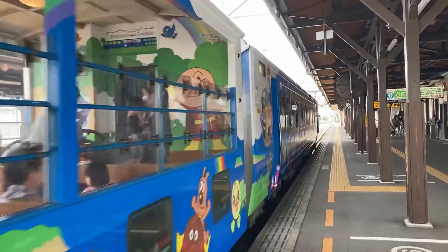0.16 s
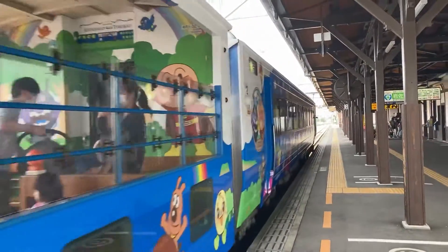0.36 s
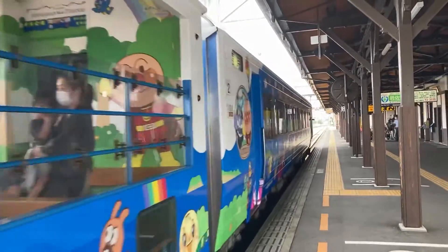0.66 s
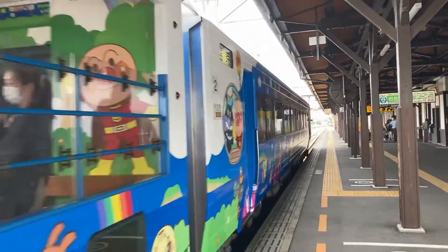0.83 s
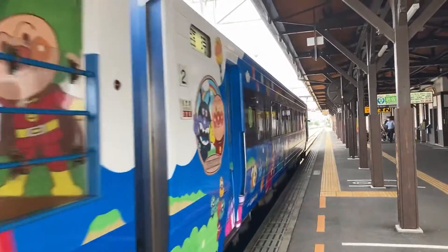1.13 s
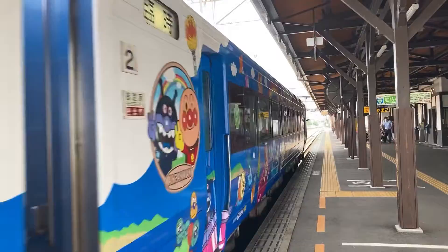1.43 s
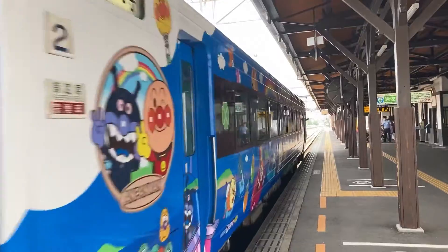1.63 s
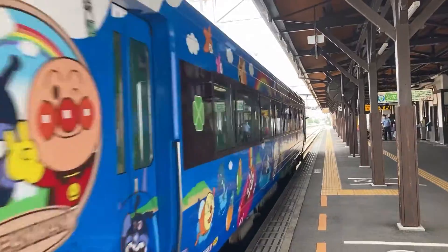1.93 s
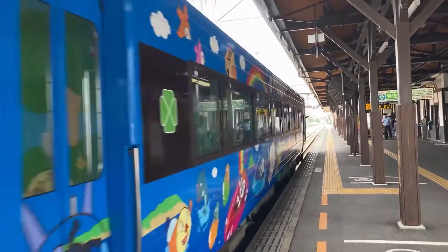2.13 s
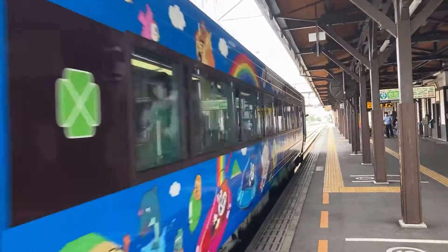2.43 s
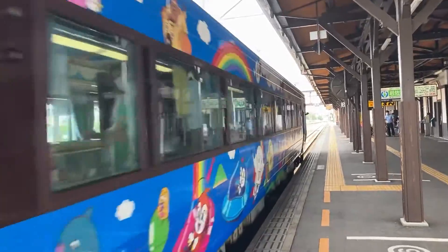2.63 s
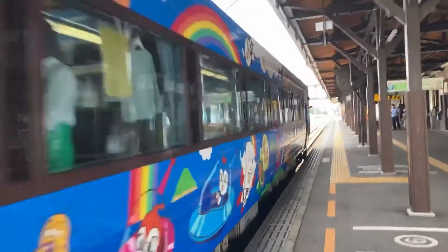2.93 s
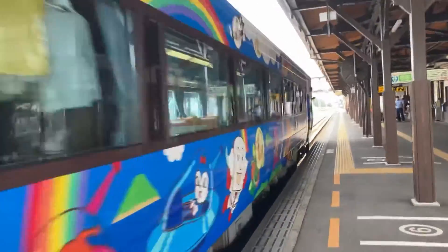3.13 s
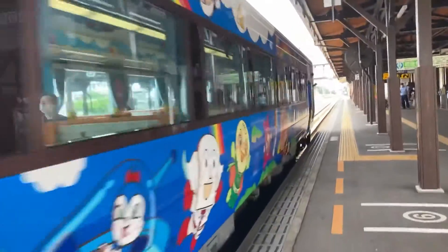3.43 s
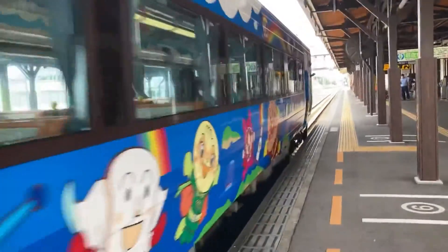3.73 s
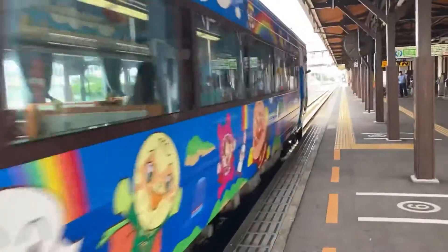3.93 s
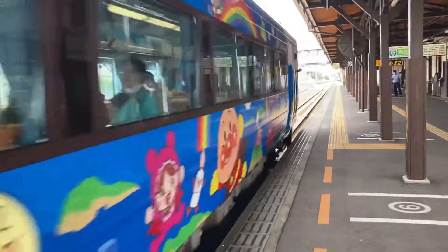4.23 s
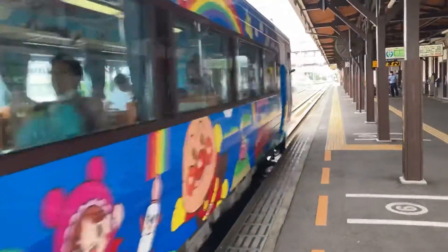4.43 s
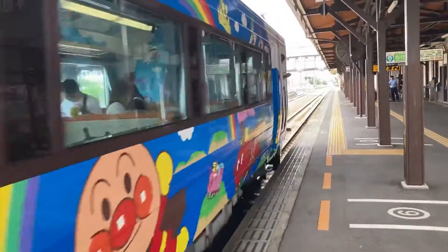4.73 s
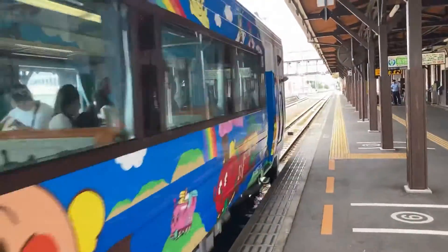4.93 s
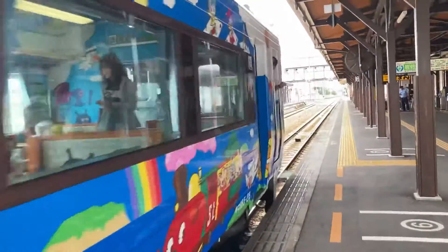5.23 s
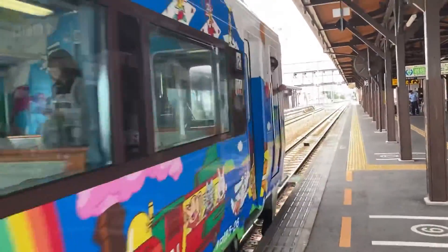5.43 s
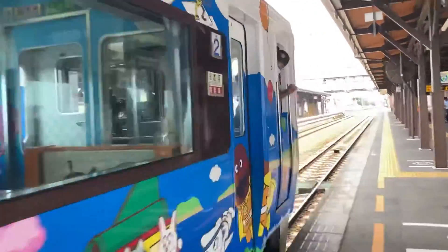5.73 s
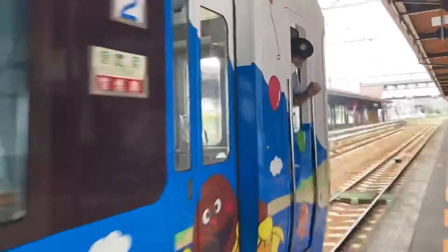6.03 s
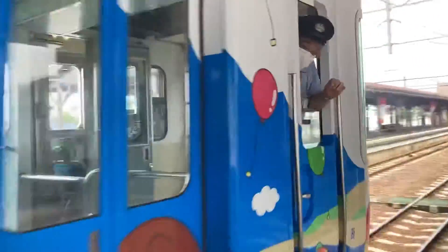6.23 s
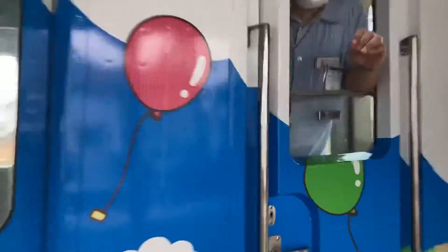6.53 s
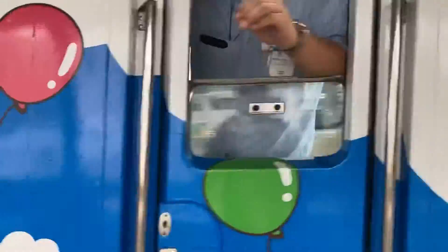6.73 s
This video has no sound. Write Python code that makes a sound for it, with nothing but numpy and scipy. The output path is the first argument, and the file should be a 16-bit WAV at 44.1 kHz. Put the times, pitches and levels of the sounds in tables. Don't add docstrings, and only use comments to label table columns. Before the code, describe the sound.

Close to a departing diesel railcar: droning exhaust, underfloor rumble, clatter and airy hiss slide past, punctuated by five hard metallic wheel knocks.

```python
import sys
import numpy as np
from scipy import signal
from scipy.fft import rfft, irfft, next_fast_len
from scipy.io import wavfile

SR = 44100
rng = np.random.default_rng(int(sys.argv[2]) if len(sys.argv) > 2 else 0)


def convert_level_to_amplitude(level_db):
    exponent = np.asarray(level_db, float) / 20
    return 10 ** exponent


def digitize_waveform(pressure):
    field = np.atleast_2d(pressure).T
    bounded = np.clip(field, -1, 1)
    quanta = np.round(bounded * 32767).astype(np.int16)
    wavfile.write(sys.argv[1], SR, quanta)


N = 302967

# (time [s], peak [dB], low rail ring [dB], middle rail ring [dB], high rail ring [dB])
WHEEL_ARRIVALS = [
    (0.604, -13.5, -12, -5.5, -18),
    (1.928, -5.5, -16, -12, -11),
    (2.534, -9, -10, -15, -4),
    (5.486, -6, -35, -4.5, -28),
    (5.923, -12, -2, -8, -6.5),
]
# (rim ring [dB], lead-in off the near rail end [dB], bounces [dB], rattle [dB])
WHEEL_CHARACTER = [(-37, 4, 5, 8), (-29, 8, -20, 1.5), (-14, -14, 0, 5.5), (-24, -3.5, -16, 2),
                   (-8.5, -19, 3.5, 9)]
# (pitch [Hz], level [dB], upper thump [dB], deep thump [dB])
FIRST_BITES = [(513, -5, -13, -23.5), (544, -2, -13, -15.5), (663, -19.5, -13.5, -12.5),
               (522, 6.5, -10, -28), (744.6, -2, -17, -4)]


def rms_one(x):
    return x / np.sqrt(np.mean(x ** 2) + 1e-20)


def in_time(rows):
    s, *columns = np.transpose(rows)
    return [np.interp(np.arange(N) / SR, s, column) for column in columns]


def at_hz(points, hz):
    p = np.array(points, float)
    return np.interp(np.log(np.maximum(hz, 1)), np.log(np.maximum(p[:, 0], 1)), p[:, 1])


def passing_db(closest_s, reach_s):
    return -20 * np.log10(1 + ((np.arange(N) / SR - closest_s) / reach_s) ** 2)


def drift(rate):
    hop = 40
    r = np.exp(-2 * hop * np.pi * rate / SR)
    coarse = rng.standard_normal(N // hop + 2002)
    slow = signal.lfilter([1], [1, -2 * r, r * r], coarse)[2000:]
    return np.interp(np.arange(N) / hop, np.arange(len(slow)), rms_one(slow))


def ring(clicks, hz, t60):
    r = convert_level_to_amplitude(-60 / (t60 * SR))
    w = 2 * np.pi * hz / SR
    return signal.lfilter([0, np.sin(w)], [1, -2 * r * np.cos(w), r * r], clicks + 1e-18)


def spread(mid, side, hz):
    # (frequency [Hz], left-right likeness [0..1])
    likeness = [(60, 0.87), (250, 0.951), (500, 0.696), (1000, 0.47), (1700, 0.13), (4000, 0.21),
                (5500, 0.44), (6800, 0.8), (16000, 0.197)]
    alike = np.clip(at_hz(likeness, hz), 0, 1)
    return np.sqrt(1 + alike) * mid + np.sqrt(1 - alike) * side * [[1], [-1]]


def banded_noise(spectrum, patchy_db, shared):
    out, together = 0, drift(30)
    lowest_hz, highest_hz = spectrum[0][0], spectrum[-1][0]
    edges = lowest_hz * 2 ** np.arange(0, np.log2(highest_hz / lowest_hz) + .01, 1 / 3)
    white = rng.standard_normal((2, 2, N))
    for k, (low, high) in enumerate(zip(edges, edges[1:])):
        band = signal.butter(2, [low, high], "band", fs=SR, output="sos")
        mid, side = signal.sosfilt(band, white[k % 2])
        hz = np.sqrt(low * high)
        flicker = shared * together + drift(5.1) + 0.435 * drift(0.9)
        out = out + convert_level_to_amplitude(at_hz(spectrum, hz) + patchy_db * flicker) * spread(mid, side, hz)
    return rms_one(out)


def crank_turns(rev_per_s, climb, short, settle_s):
    s = np.arange(N) / SR
    free_speed = rev_per_s + climb * s - short * np.exp(-s / settle_s)
    return np.cumsum(np.minimum(free_speed, 33.3)) / SR


def exhaust(turns, levels_db):
    # (multiple of crank speed, level against order 3 [dB])
    weak_orders = [(2.5, -16), (3.5, -14), (4.5, -16), (5, -14), (6, -10), (8, -12)]
    out = convert_level_to_amplitude(-53.5) * np.sin(2 * np.pi * turns)
    for multiple, level_db in zip((2, 3, 4, 7), levels_db):
        phase = 2 * np.pi * multiple * turns + .15 * drift(3)
        out = out + convert_level_to_amplitude(level_db + 1.2 * drift(5)) * np.sin(phase)
    for multiple, below_db in weak_orders:
        phase = 2 * np.pi * multiple * turns + 0.61 * drift(4.8)
        out = out + convert_level_to_amplitude(levels_db[1] + below_db - 0.5 + 3.3 * drift(4.0)) * np.sin(phase)
    return np.sqrt(2) * out


def orders_db(curve, third_db, follows_block, follows_outlet, seventh_db):
    block_db, outlet_db = in_time(curve)
    third = third_db + follows_block * (block_db + 25.5) + follows_outlet * (outlet_db + 33)
    return block_db, third, outlet_db, block_db + seventh_db + 4 * drift(1.95)


def front_engine():
    # (time [s], block throb [dB], exhaust outlet [dB])
    front_pass = [(0, -36.5, -25.5), (.2, -26, -16.5), (.33, -30, -21.5), (.43, -25.5, -38),
                  (.55, -26, -24), (.68, -23, -19), (.8, -25, -24), (1.0, -25.5, -19), (1.65, -25, -12.5),
                  (2.05, -27.5, -18), (2.45, -22, -17), (2.75, -25, -19), (3.05, -28, -16),
                  (3.55, -25.5, -28.5), (4.2, -31, -29), (4.9, -36, -36), (6.87, -35, -46)]
    turns = crank_turns(rev_per_s=30.2, climb=.27, short=3.35, settle_s=.54)
    levels_db = orders_db(front_pass, third_db=-35.5, follows_block=0.143, follows_outlet=0.23, seventh_db=-15)
    return exhaust(turns, levels_db)


def rear_engine(turns):
    # (time [s], block throb [dB], exhaust outlet [dB])
    rear_pass = [(0, -45, -50), (.6, -44, -50), (1.4, -39.5, -45), (2.1, -22, -36.5), (2.8, -33, -47),
                 (3.3, -39, -40), (3.9, -37, -35.5), (4.7, -26.5, -28.5), (5.2, -25, -34),
                 (5.7, -33.5, -40.5), (6.0, -32, -32.5), (6.35, -21, -32), (6.87, -28, -32.5)]
    levels_db = orders_db(rear_pass, third_db=-29.5, follows_block=0.52, follows_outlet=0.54, seventh_db=-24)
    return exhaust(turns, levels_db)


def noise_levels():
    # (time [s], roar from between the bogies [dB], cooling air [dB])
    car_pass = [(0, -28.5, -42.5), (.42, -28, -40.5), (.9, -26.5, -39), (1.42, -26.5, -38.5),
                (1.9, -24.5, -34), (2.3, -24, -35.5), (2.6, -21.5, -33), (3.0, -22, -32.5),
                (3.3, -21.5, -31), (3.85, -20.5, -32), (4.17, -21, -35.5), (4.8, -23, -36.5),
                (5.43, -22.5, -38.5), (5.55, -30.5, -38), (5.85, -27, -42), (6.05, -28.5, -39.5),
                (6.4, -28, -44), (6.87, -29, -42.5)]
    roar_db, air_db = in_time(car_pass)
    clatter_db = -27.5 + 0.48 * (roar_db + 25) + 0.19 * (air_db + 38)
    under_db = -24.5 + 0.617 * (roar_db + 24) + 0.28 * (air_db + 37.5)
    end_db = -25.5 + passing_db(closest_s=7, reach_s=0.7)
    rumble_db = 20 * np.log10(np.hypot(convert_level_to_amplitude(under_db), convert_level_to_amplitude(end_db)))
    return rumble_db, roar_db, clatter_db, air_db


def engine_noise(turns):
    # (frequency [Hz], density [dB per Hz])
    rumble = [(25, -20.5), (45, -6.5), (65, 1), (100, 5), (150, 0.5), (250, 0.5), (350, -6.5), (500, -80)]
    # (frequency [Hz], density [dB per Hz])
    roar = [(200, -26.5), (350, -2), (550, -3), (750, -2), (920, 1.5), (1150, -6), (1400, -9.5),
            (2000, -34.5)]
    # (frequency [Hz], density [dB per Hz])
    clatter_spectrum = [(900, -9), (1400, 3), (1700, -4), (2100, 1), (2500, -0.5), (3000, -5.5), (4200, -5),
                        (5000, -18), (6500, -48.5)]
    # (frequency [Hz], density [dB per Hz])
    hiss = [(3500, -11.5), (5000, 0.5), (5900, 0.5), (7200, -7.5), (8500, 6), (10700, -7), (12800, -8),
            (15200, -11), (17500, -12)]
    rumble_db, roar_db, clatter_db, hiss_db = noise_levels()
    firing = np.cos(4 * np.pi * turns + 1.7 * drift(6.2))
    out = convert_level_to_amplitude(rumble_db) * banded_noise(rumble, patchy_db=-1.0, shared=0.64)
    out += convert_level_to_amplitude(roar_db + 0.57 * firing) * banded_noise(roar, patchy_db=1.5, shared=0.167)
    clatter = banded_noise(clatter_spectrum, patchy_db=1.14, shared=0.55)
    dull = signal.sosfiltfilt(signal.butter(6, 2720, fs=SR, output="sos"), clatter)
    shroud_db = np.maximum(passing_db(closest_s=4.4, reach_s=2.4), -5)
    out += convert_level_to_amplitude(clatter_db + 0.61 * firing) * (dull + convert_level_to_amplitude(shroud_db) * (clatter - dull))
    return out + convert_level_to_amplitude(hiss_db + 0.69 * firing) * banded_noise(hiss, patchy_db=0.773, shared=0.65)


def auxiliary_drive():
    # (pitch [Hz], width [Hz], level [dB])
    whine_lines = [(230, 2.9, -8.5), (440.5, 14.6, 6), (924, 25, -1), (2540, 96, -2.5), (862, 45, 0),
                   (2608, 49, -0.5)]
    # (level when closest [dB], closest [s], time until 6 dB down [s])
    whine_pass = [(-22, 2.85, -0.2), (-36.5, 2.3, 2.15), (-24.5, 3.34, 0.2), (-29, 3.72, 0.67),
                  (-30, 4.78, 0.6), (-36.5, 2.5, 1.4)]
    out = 0
    for (hz, width_hz, level_db), (near_db, closest_s, reach_s) in zip(whine_lines, whine_pass):
        curve_db = near_db + passing_db(closest_s, reach_s) + 3.5 * drift(1.65)
        mid, side = ring(rng.standard_normal((2, N)), hz, 1.77 / width_hz)
        out = out + convert_level_to_amplitude(curve_db + level_db) * rms_one(spread(mid, side, hz))
    return out


def panels(level_db):
    pitches = np.geomspace(700, 4600, 12) * rng.uniform(.96, 1.04, 12)
    shaken, out = rng.standard_normal(N), 0
    for hz in pitches:
        hum = rms_one(ring(shaken * convert_level_to_amplitude(7.0 * drift(2.5)), hz, 120 / hz))
        out = out + convert_level_to_amplitude(-5.0 * np.log2(hz / 500)) * hum
    return convert_level_to_amplitude(level_db) * rms_one(out)


def gear_notes():
    # (closest [s], level [dB], time until 12 dB down [s])
    axle_gears = [
        (3.9, -30, .4),
        (5.2, -30, .3),
    ]
    s = np.arange(N) / SR
    hum_db = -26 + 2 * passing_db(closest_s=3.55, reach_s=.5) + 1.5 * drift(2)
    hum = convert_level_to_amplitude(hum_db) * np.sin(2 * np.pi * 221.5 * s + 0.344 * drift(3.9))
    near = sum(convert_level_to_amplitude(db + 2 * passing_db(closest_s, reach_s)) for closest_s, db, reach_s in axle_gears)
    start_hz, climb_hz_per_s = 154.5, 21
    mesh = np.sin(2 * np.pi * (start_hz + climb_hz_per_s * s / 2) * s + 0.63 * drift(6.9))
    return np.sqrt(2) * (hum + near * convert_level_to_amplitude(2.0 * drift(6.7)) * mesh)


def rail_and_wheel_ring(at):
    # (time after contact [s], level [dB])
    landing = [
        (0, 3.5),
        (.002, 8),
        (.004, -1),
    ]
    # (time after contact [s], level [dB])
    bounces = [
        (0.013, 1),
        (0.028, -5),
        (.045, -31),
        (.07, -1.5),
    ]
    # (pitch [Hz], level [dB], t60 [s])
    rail_modes = [(342.4, 7, 0.1), (520, 10.5, 0.082), (652, 6, 0.082)]
    # (pitch [Hz], level [dB], t60 [s])
    wheel_modes = [(206.8, -13, 0.029), (293, -12, 0.11), (419.4, -5, 0.0894), (600, -18, 0.0485),
                   (814, -47, 0.059), (930, -8, 0.058), (1200, -37, 0.04)]
    # (pitch [Hz], level [dB], t60 [s])
    rim_modes = [(2550, 0, .07), (2630, -4, .06), (3340, -10, .1), (3420, -12, .06), (4200, -12, .05)]
    rows, out = np.array(WHEEL_ARRIVALS), np.zeros(N)
    rim_db, lead_db, bounce_db, _ = np.transpose(WHEEL_CHARACTER)
    blows = [(-.018, lead_db), (-.009, lead_db - 19), *landing]
    blows += [(s, db + bounce_db) for s, db in bounces]
    luck = rng.normal(0, 1, (len(rows), len(wheel_modes)))
    modes = [(hz, db + rows[:, 2 + k], t60) for k, (hz, db, t60) in enumerate(rail_modes)]
    modes += [(hz, db + 1.8 * luck[:, k], t60) for k, (hz, db, t60) in enumerate(wheel_modes)]
    modes += [(hz, db + rim_db, t60) for hz, db, t60 in rim_modes]
    for k, (hz, level_db, t60) in enumerate(modes):
        clicks = np.zeros(N)
        for lag, blow_db in blows:
            cycles = round(lag * hz + 450 / hz)
            late = round(cycles / hz * SR)
            clicks[at + late] += convert_level_to_amplitude(rows[:, 1] + level_db + blow_db - 13.0)
        out += (-1) ** k * ring(clicks, hz, t60)
    return out


def first_bite(at):
    out = np.zeros(N)
    s = np.arange(2000) / SR
    for start, (hz, level_db, *_) in zip(at, FIRST_BITES):
        swell = np.e * s / 0.0055 * np.exp(-s / 0.0036)
        out[start:start + 2000] += convert_level_to_amplitude(level_db) * swell * np.sin(2 * np.pi * hz * s)
    return out


def ground_swing(at, level_db, hz, t60):
    push = np.zeros(N)
    push[at] = convert_level_to_amplitude(level_db) * 20 / (t60 * SR)
    return ring(ring(push, hz, t60), hz, t60)


def rattle_and_splash(at):
    peak_db = np.array(WHEEL_ARRIVALS)[:, 1]
    rim_db, _, _, rattle_db = np.transpose(WHEEL_CHARACTER)
    shake = np.zeros((2, N))
    shake[:, at] = convert_level_to_amplitude(peak_db + rattle_db + np.outer([0, 0.22], rim_db - rim_db.mean()))
    shake = signal.lfilter([1], [1, -convert_level_to_amplitude(-60 / (.35 * SR))], shake + 1e-18)
    shake = signal.lfilter([.01], [1, -.99], shake)
    dull_band = signal.butter(3, [250, 900], "band", fs=SR, output="sos")
    bright_band = signal.butter(1, [1500, 9000], "band", fs=SR, output="sos")
    rattle = signal.sosfilt(dull_band, rng.standard_normal((2, N)))
    splash = signal.sosfilt(bright_band, rng.standard_normal((2, N)))
    return shake[0] * convert_level_to_amplitude(-12.5) * spread(*rms_one(rattle), 490) + shake[1] * convert_level_to_amplitude(-27) * rms_one(splash)


def rail_joint():
    at = np.round(np.array(WHEEL_ARRIVALS)[:, 0] * SR).astype(int)
    upper_db, deep_db = np.transpose(FIRST_BITES)[2:]
    out = rail_and_wheel_ring(at) + first_bite(at)
    out += ground_swing(at, deep_db - 2, hz=55.3, t60=0.043)
    out += ground_swing(at, upper_db, hz=99.5, t60=.12)
    out += ground_swing(at, upper_db + 4, hz=188.5, t60=0.02)
    return out + rattle_and_splash(at)


def far_joint():
    # (time [s], level [dB])
    far_wheels = [
        (6.78, -13),
    ]
    out = np.zeros(N)
    for s, level_db in far_wheels:
        for hz, t60 in [(45, 0.28), (88, .25)]:
            out += ground_swing(int(s * SR), level_db, hz, t60)
    return out


def scene():
    rear_turns = -.335 + crank_turns(rev_per_s=33.75, climb=0, short=4.3, settle_s=2.6)
    engines = front_engine() + rear_engine(rear_turns) + engine_noise(rear_turns)
    clatter_db = noise_levels()[2]
    bodywork = auxiliary_drive() + panels(clatter_db - 8.5) + gear_notes()
    return engines + bodywork + rail_joint() + far_joint()


def roll_off(x):
    return signal.sosfilt(signal.butter(12, 15750, fs=SR, output="sos"), x)


def record(dry):
    # (frequency [Hz], phase by which left leads right [rad])
    left_lead = [(0, .15), (350, .35), (1030, .75), (1700, 2.5), (3800, 6.7), (5500, 9.1), (6500, 6.6),
                 (7100, 6.3), (15500, -6.3)]
    # (frequency [Hz], left minus right [dB])
    tilt = [(60, -1), (110, -2), (200, -0.5), (380, 1.0), (700, 2.5), (1290, 2), (2380, -0.5), (4400, 1),
            (8120, -1), (15000, 0.5)]
    # (from [Hz], to [Hz])
    lost_sum = [(8680, 9600), (13020, 14440)]
    # (from [Hz], to [Hz])
    lost_difference = [(11050, 11750), (15140, 22050)]
    size = next_fast_len(N + 4096)
    hz = np.arange(size // 2 + 1) * SR / size
    half = np.exp(.5j * np.interp(hz, *np.transpose(left_lead))) * convert_level_to_amplitude(.5 * at_hz(tilt, hz))
    low_cut = hz ** 2 / (hz ** 2 + 10.0 ** 2)
    rounded = .98 * np.tanh(dry / .98)
    left, right = rfft(rounded, size) * np.array([half, 1 / half]) * low_cut
    total, difference = left + right, left - right
    total[(hz > 8300) & (hz < 8680)] *= .55
    for low, high in lost_sum:
        total[(hz > low) & (hz < high)] *= .03
    for low, high in lost_difference:
        difference[(hz > low) & (hz < high)] *= .2
    ports = irfft(np.array([total + difference, total - difference]) / 2, size)[:, :N]
    return roll_off(ports)


dry = scene()
out = record(dry)
digitize_waveform(out)
```